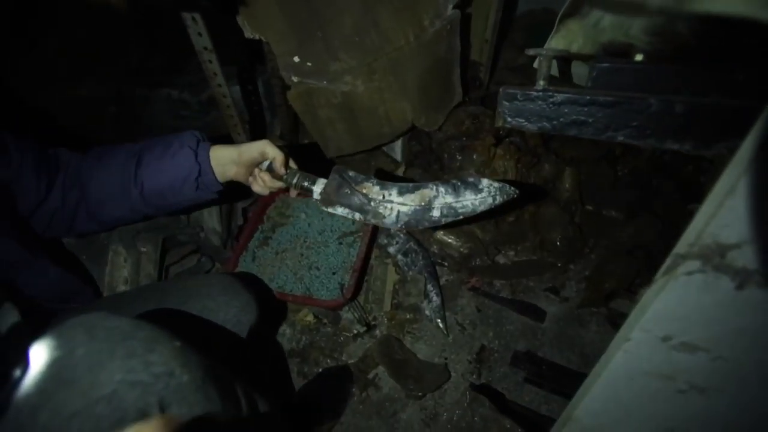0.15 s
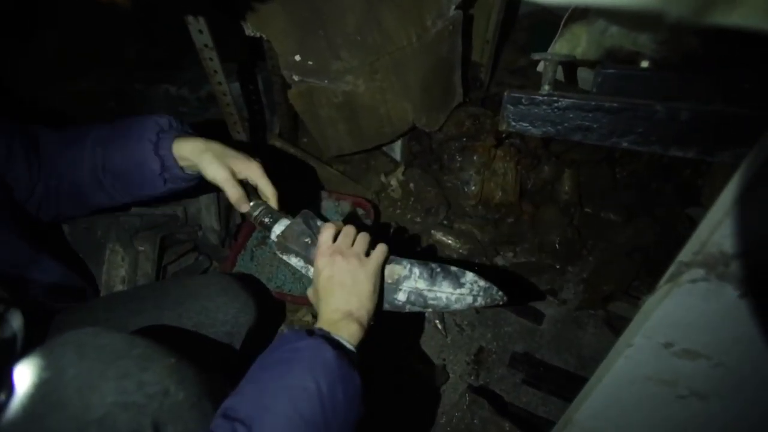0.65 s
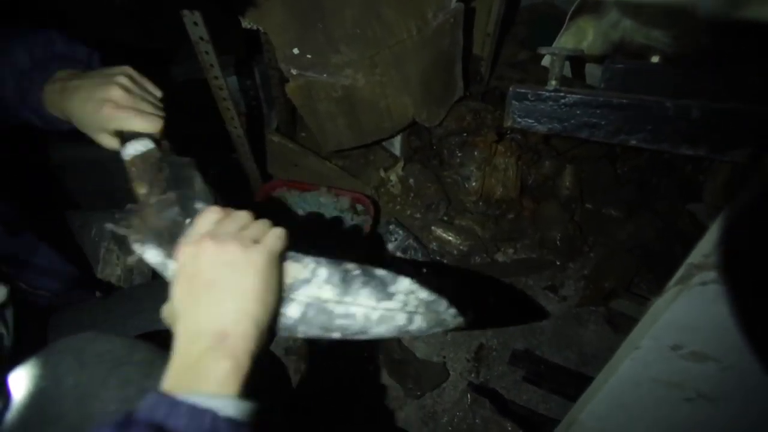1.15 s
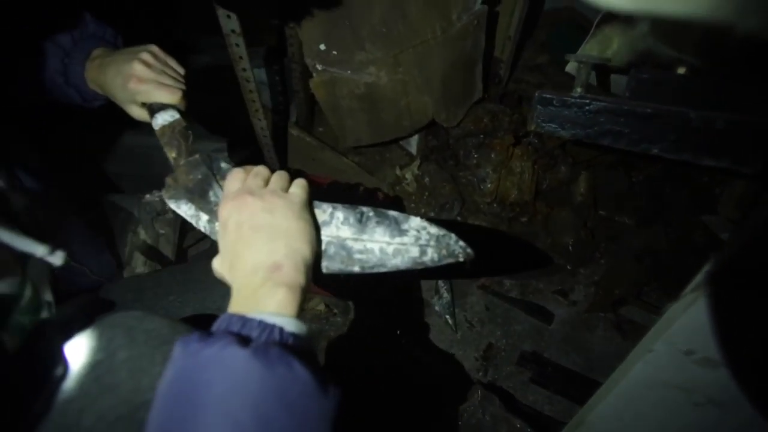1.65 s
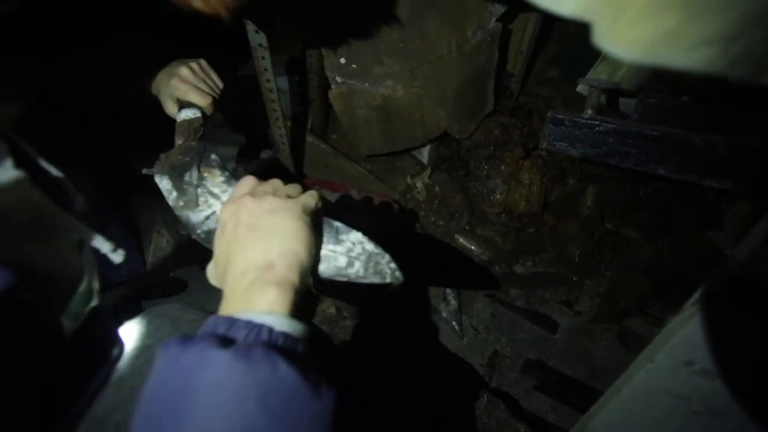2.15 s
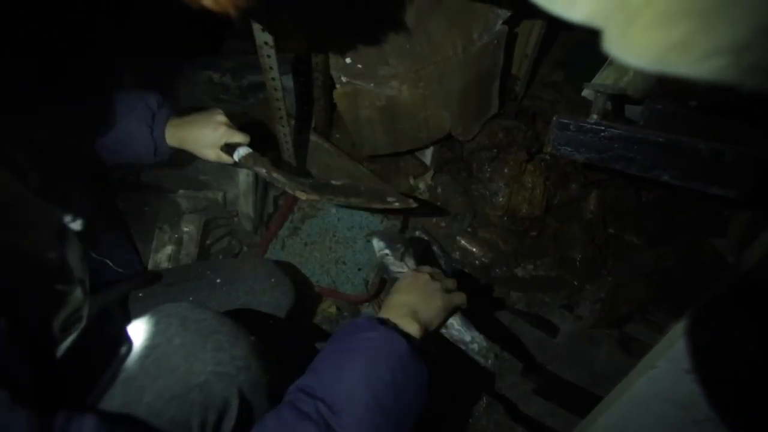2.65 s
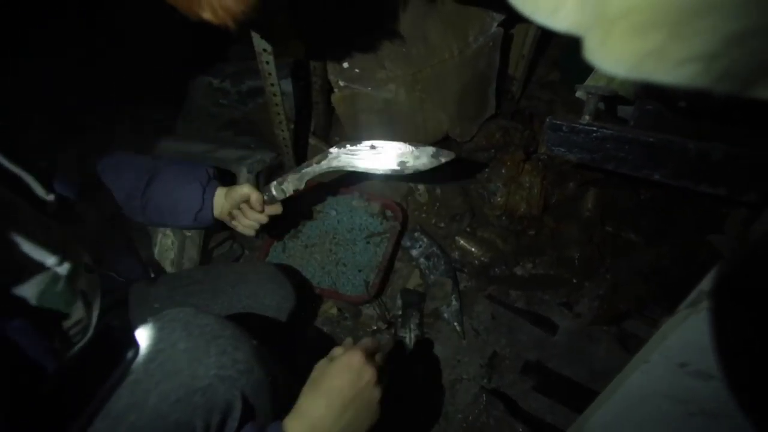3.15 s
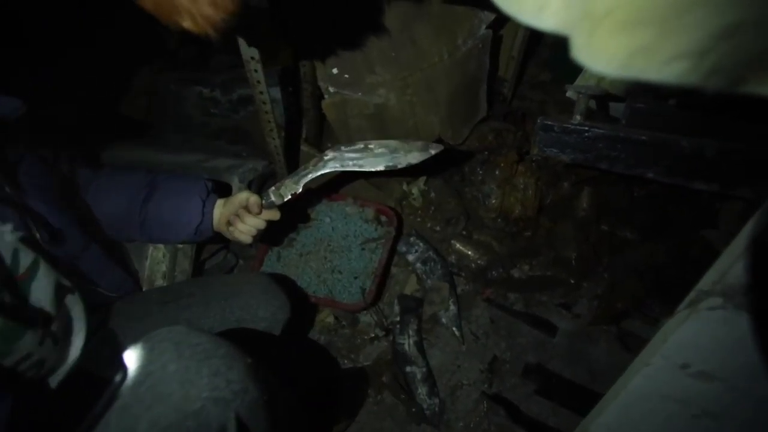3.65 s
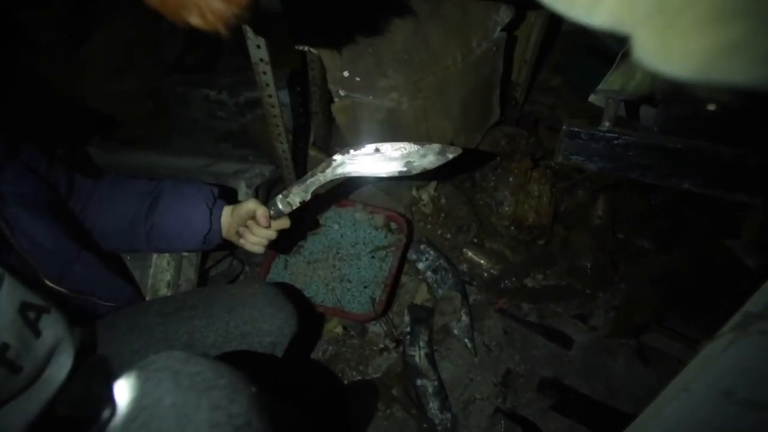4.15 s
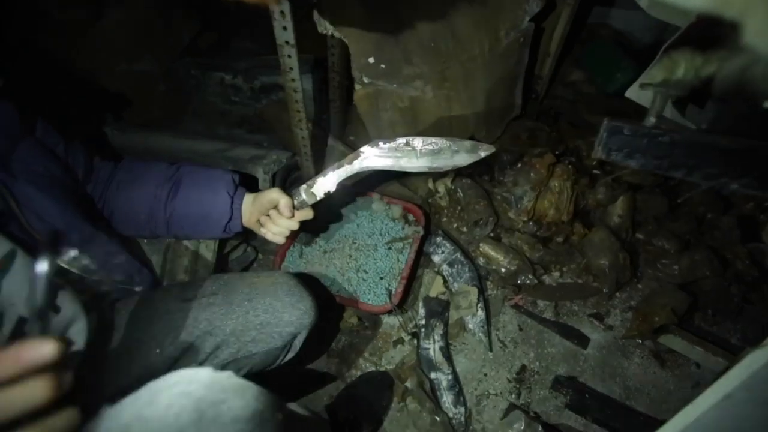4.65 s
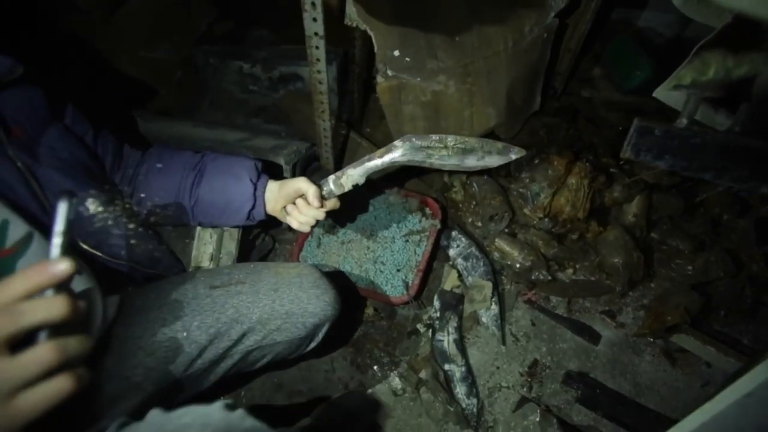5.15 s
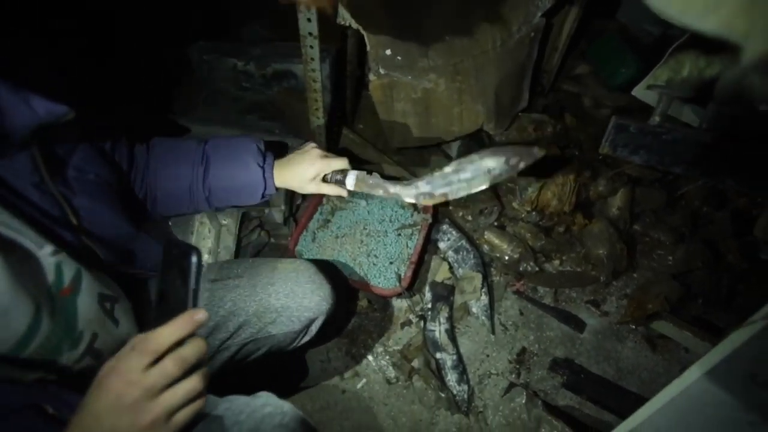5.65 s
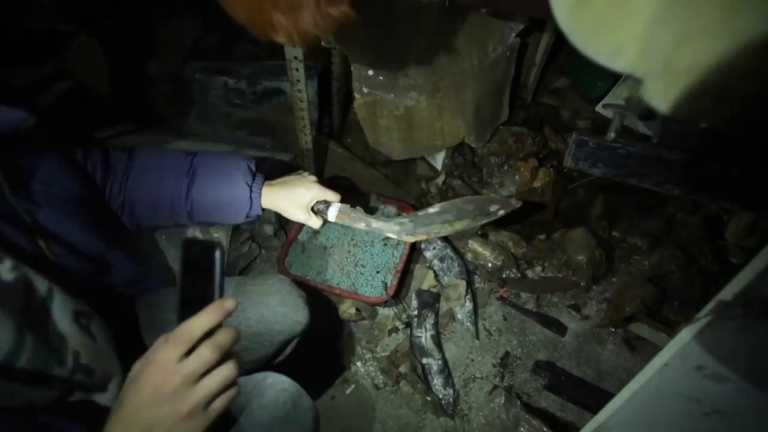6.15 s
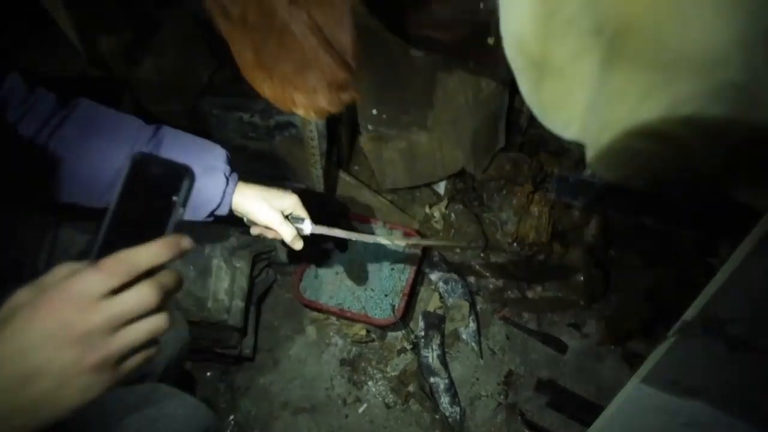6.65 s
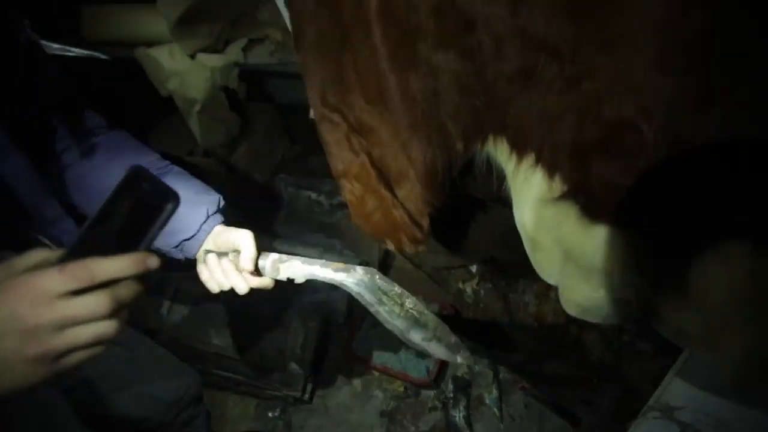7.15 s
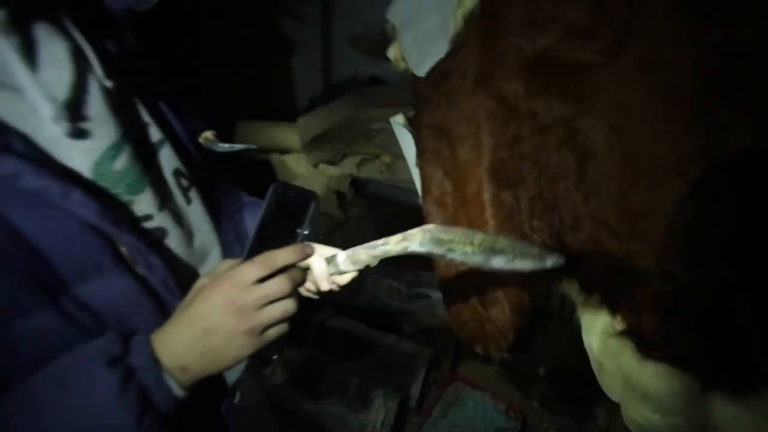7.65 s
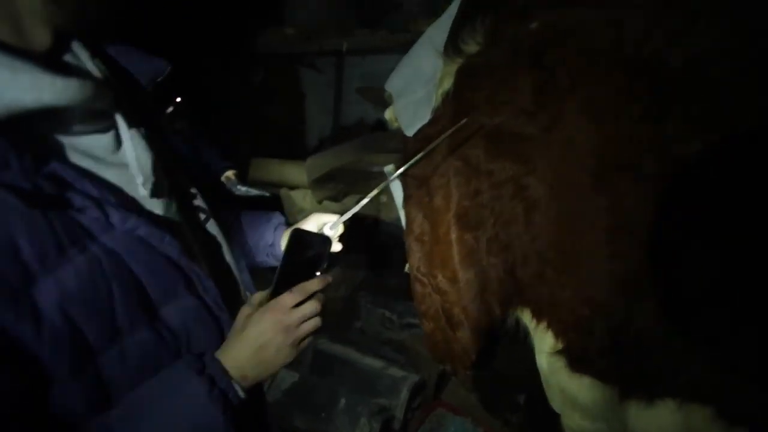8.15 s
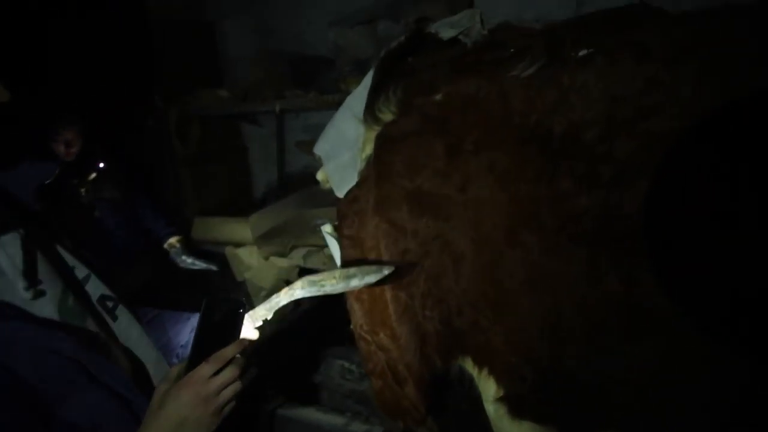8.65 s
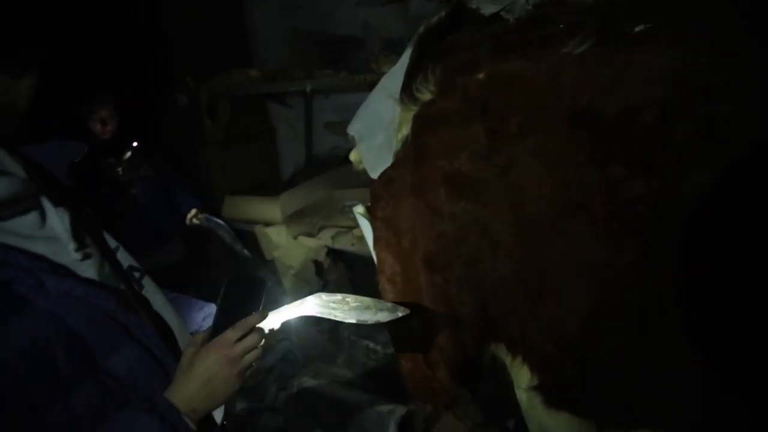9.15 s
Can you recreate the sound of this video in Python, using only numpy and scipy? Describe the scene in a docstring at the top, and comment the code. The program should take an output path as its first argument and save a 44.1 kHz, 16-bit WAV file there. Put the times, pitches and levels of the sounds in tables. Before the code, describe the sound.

Coarse, crunchy scrapes and hard clicks come in short bursts over very quiet room air as a blade is pulled free. Around three seconds a heavy, boxy thud lands, followed by strong nylon swishes. Soft rustling and light bumps continue, then a second cluster of hollow knocks, gritty ticks, low board rumble and bright metal jingling. It ends sparse and quiet, heard by one close microphone in a short-echo room.

```python
"""First jacket cloth rustles over faint room hiss and mains hum; then a big knife scrapes in jerks from its sheath.
Grit ticks, things thud on hollow junk, loose boards rumble and a steel bar rattles as someone shifts about.
Cloth and scrapes are coloured grainy noise, ticks are short noise bursts, and thuds and rattles are ringing tones.
Boards, air and hum are filtered noise. A room tail follows the small sounds, and one microphone with gain control
hears everything."""
import sys
import numpy as np
from scipy import signal
from scipy.io import wavfile
from scipy.ndimage import uniform_filter1d

SR = 44100
rng = np.random.default_rng(int(sys.argv[2]) if len(sys.argv) > 2 else 0)


def digitize_waveform(pressure):
    """Quantize a signal to 16-bit integers and store it at the path in sys.argv[1].

    Rows of a 2-D input are taken as channels; values are limited to [-1, 1].
    """
    field = np.atleast_2d(pressure).T
    bounded = np.clip(field, -1, 1)
    quanta = np.round(bounded * 32767).astype(np.int16)
    wavfile.write(sys.argv[1], SR, quanta)


N = 408366  # length of the scene in samples

# colour of rubbing jacket cloth: (frequency [Hz], level [dB per Hz])
CLOTH_COLOUR = [(88, -44), (150, -20.5), (182, -10.5), (404, -1.5), (596, -3), (657, -2), (1770, -5),
                (8220, -7.5), (11500, -12), (15600, -20)]
# jacket movements that swell and die:
# (peak time [s], rise [s per 10 dB], fall [s per 10 dB], level [dB], brightness [dB]); slopes under 0.01 act as 0.01
CLOTH_STIRS = [(0.0, .05, 0.03, -44, -1), (0.239, -0.05, 0.34, -47, 5), (.37, 0.3, 0.23, -42, -2.5),
               (.76, 0.1357, 0.1855, -43.5, 2), (1.04, 0.1273, 0.29, -42.5, 1.5),
               (1.3, 0.09, 0.41, -46.5, -3.5), (1.561, 0.0355, 0.0444, -40.5, 1.5),
               (1.742, 0.07, 0.0554, -44.5, 7.5), (2.1, 0.2268, 0.13, -42.5, 1),
               (2.42, 0.17, 0.1, -45.5, 1.5), (2.58, 0.07, 0.36, -43.5, 0), (2.74, 0.0537, 0.2, -43.5, 8),
               (2.9, -0.02, 0.0452, -43.5, 8), (3.03, -0.0262, 0.0622, -28.5, -4),
               (3.189, 0.13, 0.1166, -28.5, -3.5), (3.4, 0.3141, 0.09, -37, 4.5),
               (3.679, 0.1054, 0.1938, -38, -2.5), (4.06, 0.16, 0.03, -45.5, -4),
               (4.17, 0.2, 0.23, -44, -1), (4.31, 0.21, 0.04, -47.5, -3), (4.44, 0.12, 0.59, -48.5, 2.5),
               (4.6, 0.0966, 0.33, -43.5, -2.5), (4.729, 0.1167, 0.0922, -39.5, -3),
               (5.23, 0.1, 0.1645, -43.5, -6), (5.368, -0.0129, 0.1327, -33.5, -2),
               (5.58, 0.19, 0.2228, -43, 0.5), (5.81, 0.65, -0.19, -48, -0.5),
               (6.13, 0.01, 0.1019, -32.5, -3.5), (6.188, 0.0738, 0.1387, -30.5, -0.5),
               (6.528, 0.0866, 0.1724, -34, -1.5), (6.76, 0.3675, 0.0334, -41.5, 4.5),
               (7.05, 0.76, 0.15, -46, -2), (7.22, 0.29, 0.18, -40.5, 2), (7.4, 0.2111, 0.2156, -36, 1),
               (7.61, 0.3833, 0.1287, -37, -8), (7.96, 0.22, 0.49, -49, 0.5),
               (8.13, 0.15, 0.0549, -47, -4.5), (8.34, 0.0755, 0.0692, -35.5, 1),
               (8.43, .1, 0.1331, -44, 1.5), (8.72, 0.25, 0.18, -53, -11), (8.88, 0, -0.78, -52.5, 1.5),
               (9.04, 0.25, -0.36, -52.5, 0)]
# the hollow of the jacket folds opens and closes with posture: (time [s], resonance [Hz])
FOLD_HOLLOWS = [(0, 1500), (1.3, 1370), (1.74, 3200), (2.45, 2100), (2.6, 900), (2.85, 3620), (3.0, 783),
                (3.3, 780), (3.42, 2030), (3.88, 950), (4.18, 2840), (4.76, 2290), (5.25, 906),
                (5.67, 1700), (6.0, 1250), (6.1, 2100), (6.35, 1370), (6.5, 1850), (7.05, 1730),
                (7.42, 755), (7.65, 3100), (7.8, 1230), (8.7, 1187), (8.85, 780), (9.02, 2600)]
# jerks of the blade in the sheath and scrapes on grit:
# (start [s], length [s], level [dB], change along the stroke [dB], boosted frequency [Hz])
BLADE_JERKS = [(0.574, 0.101, -33, -3.5, 2390), (1.175, 0.0627, -10, 3, 2000),
               (1.21, 0.056, -13.5, -10, 1900), (1.364, 0.093, -39, -1.5, 2150),
               (1.946, 0.1306, -31, 8, 2420), (2.24, 0.0583, -32, 0, 2300), (2.291, 0.0552, -7, -5, 3170),
               (2.318, 0.064, -15.5, -1.5, 2980), (2.946, 0.0498, -22.5, 25, 1040),
               (3.081, 0.0628, -17.5, -11.5, 1160), (7.35, 0.047, -33, -3, 1700),
               (7.564, 0.084, -34, -8, 1750)]
# colour of the scraped sheath: (frequency [Hz], level [dB per Hz])
SHEATH_COLOUR = [(88, -55), (150, -29), (396, -3), (969, 1), (1130, 3.5), (1610, -4.5), (2110, -1),
                 (3110, -3), (8060, -9), (12500, -13.5), (15600, -20.5)]
# grit and small snaps: (time [s], level [dB], centre [Hz], width [share of the centre])
GRIT_TICKS = [(0.7785, -14, 4120, 1.55), (.991, -22.5, 1880, 2.9), (1.005, -20.5, 6680, 0.75),
              (1.499, -29, 3960, 1.8), (1.541, -16.5, 3150, 2.4), (1.6013, -11.5, 6400, 0.345),
              (1.6206, 0.55, 2500, 2.04), (1.727, -16, 6010, 0.71), (1.7626, -21.5, 4030, 0.7),
              (1.8332, -24, 3110, 2.4), (1.874, -29, 8080, 0.91), (1.9046, -25, 8030, 1),
              (1.9253, -27.5, 4080, 0.89), (2.1286, -17, 5470, 2.2), (2.2534, -15, 4010, 1.64),
              (2.3331, 1, 5010, 1.11), (2.4116, -8.5, 1910, 2.3), (2.4404, -23, 4000, 0.35),
              (2.5478, -13.5, 6170, 2), (2.554, -13, 4080, 1.27), (2.586, -7.5, 1430, 2.3),
              (2.624, -19.5, 2990, .88), (2.637, -21.5, 8190, .52), (2.67, -16, 5120, 0.65),
              (2.6984, -17.5, 7100, .38), (2.7088, -19.5, 3950, 0.73), (2.724, -18, 7400, 0.88),
              (2.7359, -13.5, 1550, 1.66), (2.8139, -11.5, 4770, 0.78), (2.879, -22, 4130, 0.67),
              (2.911, -16, 5200, 0.95), (2.975, 12.5, 907, 2.9), (3.0388, -12, 920, 4.7),
              (3.17, -16, 3000, 1.17), (4.1783, -23.5, 3110, 0.85), (5.238, -22.5, 1290, 1.67),
              (5.355, -24.5, 3000, 2.6), (6.8478, -23, 6570, 1.02), (6.87, -27, 1300, 0.345),
              (6.9247, -29, 6330, 0.97), (7.3896, -14.5, 7900, 0.136), (7.5151, -26, 7990, .51),
              (7.5445, -27, 5990, 0.37), (7.5749, -14.5, 5640, 0.84), (7.613, -4.5, 2600, 2.13),
              (7.716, -22, 7850, 0.95), (7.7836, -29.5, 9075, 0.47), (7.9315, -23.5, 7100, 0.76),
              (8.0266, -28.5, 4080, 1.28), (8.1221, -19, 1170, 0.47), (8.188, -23, 4940, 0.326),
              (8.3109, -25, 3720, 1.8), (8.36, -22, 6200, 0.31), (8.6072, -27, 3130, 2.6),
              (8.6156, -29, 3540, 2.66), (9.0272, -17.5, 1850, 1.024)]
# loose grit settling at random: (start [s], end [s], rate [ticks per s], middle level [dB])
GRIT_CRUMBS = [(1.299, 1.95, 10.3, -30.5), (2.418, 2.942, 10.4, -24.5), (7.659, 8.204, 14, -33),
               (8.449, 9.1, 5, -38)]
# blows on hollow junk:
# (time [s], peak [dB], modes driven most [Hz], settling time, at least 0.002 [s], room send [dB])
JUNK_THUDS = [(.938, -31, 1140, 0.0048, -14), (1.62, -12, 1390, 0.0029, -19.5),
              (2.412, -14, 857, 0.0027, -23.5), (2.585, -14, 600, 0.00193, -29),
              (2.736, -19.5, 857, .0025, -18.5), (2.956, -4, 510, 0.0232, -7),
              (2.9754, 11, 732, .002, -14.5), (2.984, -8, 620, 0.021, -3.5), (3.038, -8, 653, 0.0243, -4.5),
              (3.64, -27.5, 1410, 0.078, -10.5), (3.71, -32, 976, 0.048, -13.5),
              (5.236, -27, 853, .015, -10.5), (5.354, -19, 506, 0.0148, -8.5),
              (7.424, -2.5, 586, 0.00655, -15), (7.4314, -5.5, 483, 0.0103, -15.5),
              (7.459, -14, 446, 0.023, -11.5), (7.565, -21, 334, 0.037, -9.5),
              (7.591, -16, 1500, .0089, -15), (7.611, -14.5, 1500, 0.0168, -9),
              (8.049, -29.5, 1020, 0.0093, -14), (8.121, -19.5, 1270, 0.0079, -7.5),
              (8.316, -25.5, 1100, 0.0086, -17), (8.405, -28.5, 1050, 0.0122, -9.5),
              (8.562, -38.5, 800, 0.0041, -16), (8.61, -31.5, 404, 0.0053, -9.5),
              (8.668, -36.5, 700, 0.0035, -14.5), (8.697, -26, 1338, 0.0085, -4.5),
              (8.7, -34.5, 230, 0.0037, -18.5), (9.027, -27.5, 497, 0.0035, -20.5)]
# ringing modes of the junk: (usual frequency [Hz], usual level [dB], free fade by 60 dB [s])
JUNK_MODES = [(105.2, 2.5, 0.061), (217.9, 1.5, 0.067), (307.8, 3, 0.0613), (422, 0.5, 0.0211),
              (487, -2.5, 0.0544), (632.6, 4.5, 0.0435), (720, 1, 0.029), (826, 0.5, 0.0499),
              (920, -21, 0.0193), (1120, -22.5, 0.0235), (1274, 5.5, 0.0243), (1500, -2.5, 0.026),
              (1750, -3, 0.0404)]
# knocks on the steel bar: (time [s], peak [dB], modes driven most [Hz], settling time [s])
BAR_RATTLES = [(6.847, -23, 6860, 0.00355), (6.924, -32.5, 7120, 0.0041), (7.36, -19.5, 11900, 0.019),
               (7.364, -22, 4260, 0.018), (7.388, -18.5, 8260, 0.0071), (7.392, -30, 2500, .015),
               (7.43, -30.5, 4300, 0.044), (7.49, -30.5, 8500, .015), (7.502, -32.5, 4300, 0.0195),
               (7.506, -28.5, 12000, 0.0059), (7.514, -23.5, 8800, 0.0051), (7.576, -28.5, 11500, 0.009),
               (7.592, -18.5, 8500, 0.0046), (7.599, -16, 6050, 0.0041), (7.615, -18, 5500, 0.00265),
               (7.624, -26, 4320, 0.039), (7.652, -34, 5000, .01)]
# ringing modes of the bar: (usual frequency [Hz], usual level [dB], free fade by 60 dB [s])
BAR_MODES = [(2600, 6.5, 0.173), (4260, 2.5, 0.246), (4286, 13.5, 0.05), (5951, 11, 0.11),
             (6060, 4.5, 0.105), (7990, -17.5, 0.08), (8078, 10.5, 0.128), (8500, 3.5, 0.167),
             (10860, -1.5, 0.14), (11010, -3, .1), (13400, -4.5, .1), (13920, -1.5, .08)]
# body weight shifting on loose boards: (start [s], level [dB], fade by 60 dB [s], centre [Hz])
BOARD_THUMPS = [(2.957, -22, 0.52, 230), (5.22, -42.5, 0.274, 210), (5.354, -35, 0.38, 200),
                (6.14, -40.5, 0.416, 175), (7.359, -42, 0.39, 120), (7.425, -27, 0.49, 169.5),
                (7.56, -32.5, 0.534, 130), (8.12, -44.5, 0.57, 170), (8.375, -38, 0.51, 221),
                (8.6, -45.5, .2, 179), (8.695, -43.5, 0.28, 140)]
# how long the room tail lasts: (frequency [Hz], fade by 60 dB [s])
ROOM_FADES = [(150, 0.635), (500, 0.462), (1200, 0.33), (4000, 0.224), (12000, 0.115)]
# colour of the still air: (frequency [Hz], level [dB per Hz])
AIR_COLOUR = [(13, -35.5), (22, -10.5), (108, 0.5), (227, 0), (404, -2), (681, -5.5), (826, -4),
              (1000, -9.5), (1320, -13), (1830, -11.5), (8530, -20), (15600, -27)]
# mains hum: (frequency [Hz], level [dB], wavering width [Hz])
MAINS_HUM = [(52, -62.5, 17.7), (102.84, -60, 16.7)]


def gain_of(db):
    """Turns decibels into a gain."""
    return np.exp(np.asarray(db) * (np.log(10) / 20))


def evened(x):
    """Scales to an rms level of 1."""
    return x / np.sqrt(np.mean(x ** 2) + 1e-20)


def peaked(x, db):
    """Scales to a peak level in dB."""
    return gain_of(db) * x / np.abs(x).max()


def read(points, hz):
    """Reads a table between its points, on a log-frequency axis."""
    f, value = np.transpose(points)
    return np.interp(np.log(hz + 1), np.log(f + 1), value)


def bump(hz, centre_hz, octaves):
    """Bell shape on a log-frequency axis, 1 at the centre."""
    return np.exp(-.5 * (np.log2((hz + 1) / centre_hz) / octaves) ** 2)


def add(mix, s, sound):
    """Mixes a sound in at time s."""
    part = mix[round(s * SR):][:len(sound)]
    part += sound[:len(part)]


def band(x, lo_hz, hi_hz):
    """Keeps the frequencies between two limits."""
    limits = [lo_hz, min(hi_hz, SR / 2.1)]
    return signal.sosfilt(signal.butter(2, limits, "bandpass", fs=SR, output="sos"), x)


def smooth_noise(count, size):
    """Random wandering at rms 1, smoothed over size steps."""
    return evened(uniform_filter1d(rng.standard_normal(count), size=size))


def patchy(times, pitches, time_size, pitch_size):
    """Random patches over frequency and time, at rms 1."""
    noise = rng.standard_normal((times, pitches))
    noise = uniform_filter1d(noise, size=time_size, axis=0)
    return evened(uniform_filter1d(noise, size=pitch_size, axis=1)).T


def shaped(x, spectrum, change_db, size=256):
    """Colours x by a spectrum and by change_db(s, Hz), a dB map over time and frequency."""
    hz, t, z = signal.stft(x, SR, nperseg=size, noverlap=size * 3 // 4)
    base = evened(gain_of(read(spectrum, hz)))
    z *= base[:, None] * gain_of(change_db(t, hz[:, None]))
    return signal.istft(z, SR, nperseg=size, noverlap=size * 3 // 4)[1][:len(x)]


def grains(count, per_s, spread_db, hiss):
    """Fibres catching and letting go: clicks of uneven size over a hiss."""
    size_db = spread_db * np.minimum(rng.exponential(1, count), 5)
    size = gain_of(size_db) * rng.standard_normal(count)
    clicks = size * (rng.random(count) < per_s / SR)
    return evened(clicks) + hiss * rng.standard_normal(count)


def cloth():
    """Grainy rubbing of nylon in drifting patches, coloured by the hollow of the folds."""
    peak_s, rise_s, fall_s, peak_db, bright_db = np.transpose(CLOTH_STIRS)

    def field(t, hz):
        patches = patchy(len(t), len(hz), 30, 6)
        flicker = smooth_noise(len(t), 8)  # whole folds slipping at once
        late = t[:, None] - peak_s
        drop = np.maximum(late / np.maximum(fall_s, .01), -late / np.maximum(rise_s, .01))
        swell_db = peak_db - 10 * drop
        treble = np.clip(np.log2(hz / 4500 + 1e-9), 0, 1)
        bass = np.clip(np.log2(1800 / (hz + 1)), 0, 1)
        tilt = 1.126 * treble - 0.537 * bass
        hollow_db = 4.883 * bump(hz, np.interp(t, *np.transpose(FOLD_HOLLOWS)), 0.594)
        power = gain_of(2 * tilt * bright_db) @ gain_of(2 * swell_db).T  # all movements together
        return 10 * np.log10(power + 1e-12) + hollow_db + 1.09 * patches + 0.81 * flicker

    rub = evened(grains(N, per_s=2500, spread_db=1.5, hiss=1.704))
    return shaped(rub, CLOTH_COLOUR, field)


def jerk(s, length, db, change_db, loud_hz):
    """Dense stick-slip crunch of a hard edge dragged along a rough surface."""
    bite_s, slip_s, edge_db = 0.01583, 0.02224, -23.5  # the edge bites from edge_db up and slips free again
    dull_per_db = -0.239  # treble dB lost for each dB of harder pressure
    t = np.arange(0, length, 1 / SR)
    press_db = db + change_db * t / length

    def field(u, hz):
        high = np.clip(np.log2(hz / 3000 + 1e-9), 0, 1)
        rasp = patchy(len(u), len(hz), 6, 4)  # the ringing spot wanders along the stroke
        dull_db = high * (dull_per_db * (db + change_db * u / length) + 1.0)
        return dull_db + 6 * bump(hz, loud_hz, 0.575) + 2.48 * rasp

    rub = shaped(evened(grains(len(t), per_s=6700, spread_db=3.5, hiss=1.196)), SHEATH_COLOUR, field)
    lumps = gain_of(1.22 * smooth_noise(len(t), 150))
    ends_db = edge_db * (np.maximum(1 - t / bite_s, 0) + np.maximum(1 - (length - t) / slip_s, 0))
    return s, gain_of(press_db + ends_db) * evened(rub) * lumps * signal.windows.tukey(len(t), .1)


def tick(s, db, hz, width):
    """A sharp crack, a weaker after-crack and a short noisy tail around one centre."""
    tail_s = 0.0242  # time to fade by 60 dB
    t = np.arange(SR // 24) / SR
    after = t - rng.uniform(.0015, .005)
    crack = gain_of(-60 * t / .004)
    after_crack = .5 * (after > 0) * gain_of(-60 * abs(after) / .005)
    tail = 0.296 * gain_of(-60 * t / tail_s)
    burst = rng.standard_normal(len(t)) * (crack + after_crack + tail)
    burst[0] += 2.57 * np.sign(burst[0])  # the snap itself
    spread = 1 + np.clip(width, .1, 6)
    return s, peaked(band(burst, hz / spread, hz * spread) + 0.124 * burst, db - 0.5)


def crumbs():
    """Settling grit: rows of faint, high ticks at random times."""
    rows = []
    for start, end, per_s, db in GRIT_CRUMBS:
        for when, size, pitch in rng.random((round(per_s * (end - start)), 3)):
            s = start + when * (end - start)
            rows.append((s, db + 6.2 * (size - .5), 3500 * 2 ** (1.6 * pitch), .6))
    return rows


def strike(modes, s, db, centre_hz, settle_s, ring_factor, octaves, detune, per_s, free_db, rise_s):
    """One blow and the small bounces as the thing settles ring its modes, most strongly near the centre."""
    t = np.arange(SR // 7) / SR
    hz, mode_db, t60 = np.transpose(modes)[:, :, None]
    # each spot struck weighs, bends and flips the modes
    weigh, bend, flip = rng.standard_normal((3, len(modes), 1))
    mode_db = mode_db + 2 * weigh + 28 * bump(hz, centre_hz, octaves)
    # contact damps most of the ring fast; a weaker part rings on freely
    fade = gain_of(-60 * t / (t60 * max(ring_factor, .1))) + gain_of(free_db - 60 * t / t60)
    waves = np.sign(flip) * np.sin(2 * np.pi * hz * (1 + detune * bend) * t)
    ring = (gain_of(mode_db) * fade * waves).sum(0) * (1 - np.exp(-t / rise_s))  # contact builds up
    bounces = (rng.random(len(t)) < per_s / SR) * rng.standard_normal(len(t))
    bounces *= 0.677 * np.exp(-t / max(settle_s, .002))
    bounces[0] = 1  # the blow itself
    return s, peaked(signal.fftconvolve(bounces, ring), db)


def thud(s, db, centre_hz, settle_s):
    """A blow on hollow junk; harder blows throw it clear, so it rings longer."""
    ring_factor = np.clip(0.856 + 0.06 * db, .2, .8)
    return strike(JUNK_MODES, s, db, centre_hz, settle_s, ring_factor, octaves=1.057,
                  detune=0.0406, per_s=500, free_db=-38.5, rise_s=0.000654)


def rattle(s, db, centre_hz, settle_s):
    """A knock on the steel bar, with quick bounces and a bright ring."""
    return strike(BAR_MODES, s, db, centre_hz, settle_s, ring_factor=0.318, octaves=.62,
                  detune=0.00286, per_s=1200, free_db=-11.5, rise_s=0.00022)


def thump(s, db, t60, hz):
    """Loose boards under shifting weight: a lumpy low rumble that starts fast and dies away."""
    t = np.arange(SR // 3) / SR
    lumps = gain_of(2.76 * smooth_noise(len(t), 600))
    low = band(rng.standard_normal(len(t)), hz / 1.85, hz * 1.89)
    low = evened(band(low, 73, 600))
    return s, gain_of(db - 60 * t / max(t60, .05)) * np.minimum(t / 0.0037, 1) * lumps * low


def room(x):
    """Diffuse echo tail made from fading noise, the bass lasting longest."""
    hz, t, z = signal.stft(rng.standard_normal(SR), SR, nperseg=512)
    fade = gain_of(-60 * t / read(ROOM_FADES, hz)[:, None])
    tail = signal.istft(z * fade, SR, nperseg=512)[1]
    tail = tail * np.clip(np.arange(len(tail)) / SR / 0.0093, 0, 1)  # first walls are a few metres off
    return signal.oaconvolve(x, tail / np.linalg.norm(tail))[:N]


def air():
    """Still-room hiss and rumble from coloured noise, with mains hum wavering as narrow noise bands."""
    hiss = shaped(rng.standard_normal(N), AIR_COLOUR, lambda t, hz: 0 * t, size=2048)
    sound = gain_of(-50.5) * evened(hiss)
    for hz, db, width in MAINS_HUM:
        sound += gain_of(db) * evened(band(rng.standard_normal(N), hz - width / 2, hz + width / 2))
    return sound


def scene():
    """All sources in one room, heard by one microphone on two equal channels."""
    near, sent = np.zeros(N), np.zeros(N)  # direct sound, and what goes to the room tail
    for row in BLADE_JERKS:
        add(near, *jerk(*row))
    for row in GRIT_TICKS + crumbs():
        add(near, *tick(*row))
    for row in BAR_RATTLES:
        add(near, *rattle(*row))
    sent += gain_of(-23.5) * near
    for *row, send_db in JUNK_THUDS:
        s, sound = thud(*row)
        add(near, s, sound)
        add(sent, s, gain_of(send_db) * sound)
    boards = np.zeros(N)
    for row in BOARD_THUMPS:
        add(boards, *thump(*row))
    small = band(near + room(sent), 122.5, SR / 2)  # small things radiate no deep bass
    return np.tile(small + boards + cloth() + air(), (2, 1))


def top_cut(x):
    """Nothing passes above the cut-off."""
    return signal.sosfilt(signal.butter(12, 17070, fs=SR, output="sos"), x)


def record(dry):
    """Gain control ducks around loud bursts, the highest treble is cut and the input clips."""
    power_db = 10 * np.log10(abs(uniform_filter1d(dry[0] ** 2, size=800)) + 1e-12)
    fall = np.arange(N) * 97.2 / SR  # the held level falls by 97.2 dB a second
    held_db = np.maximum.accumulate(power_db + fall) - fall
    over_db = np.maximum(held_db + 28, 0)  # ducking starts at -28 dB
    ducked = dry[:1] / gain_of(0.228 * uniform_filter1d(over_db, size=400))
    low_pass = signal.firwin(255, 15950, window=("kaiser", 7), fs=SR)
    ducked = signal.oaconvolve(ducked, low_pass[None], "same")
    mix = np.tile(np.clip(ducked, -1, 1), (2, 1))
    return top_cut(mix)


dry = scene()
out = record(dry)
digitize_waveform(out)
```